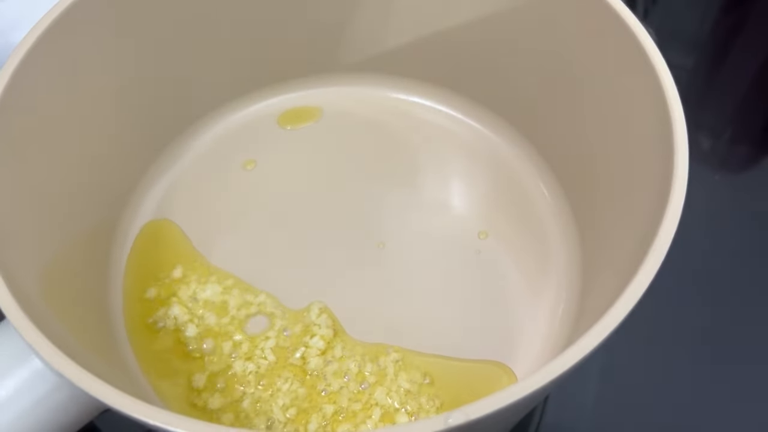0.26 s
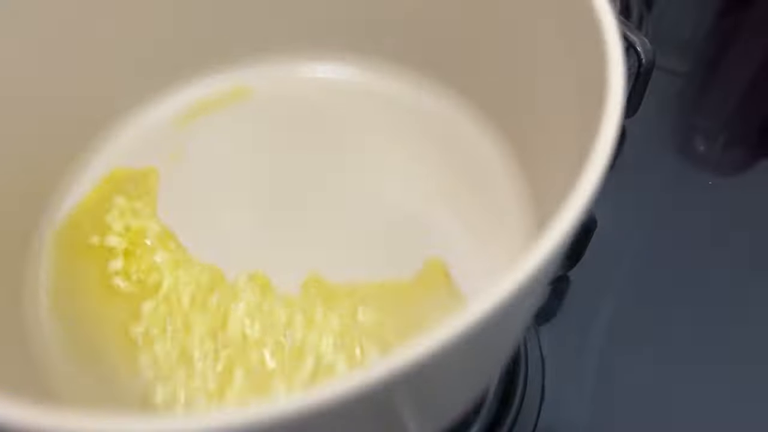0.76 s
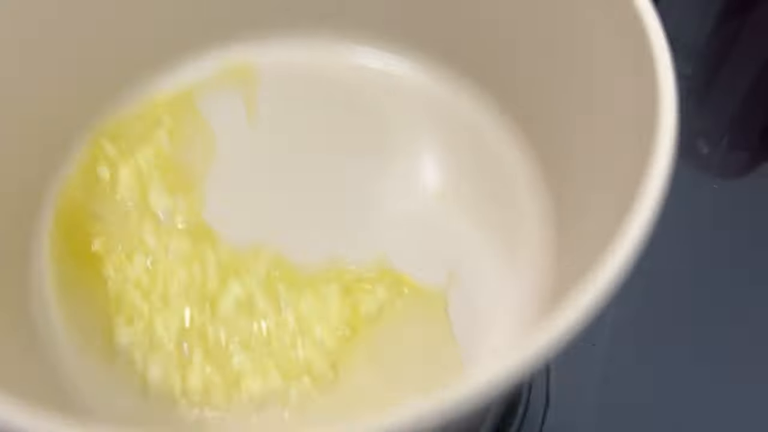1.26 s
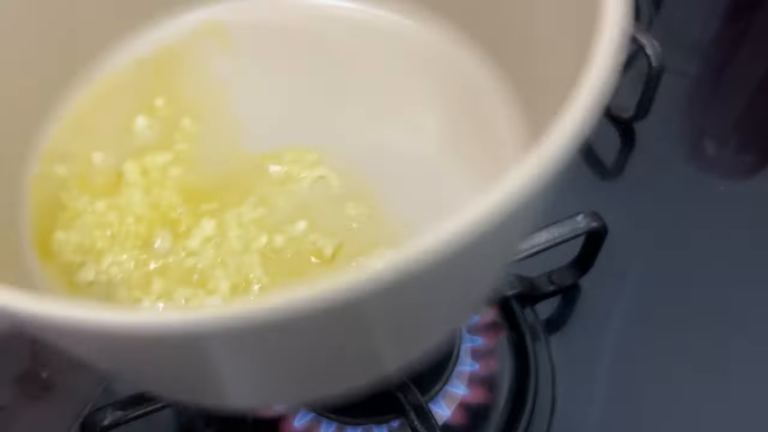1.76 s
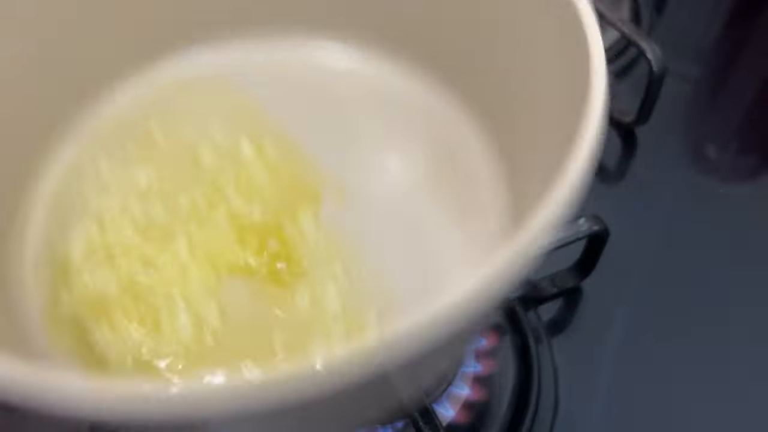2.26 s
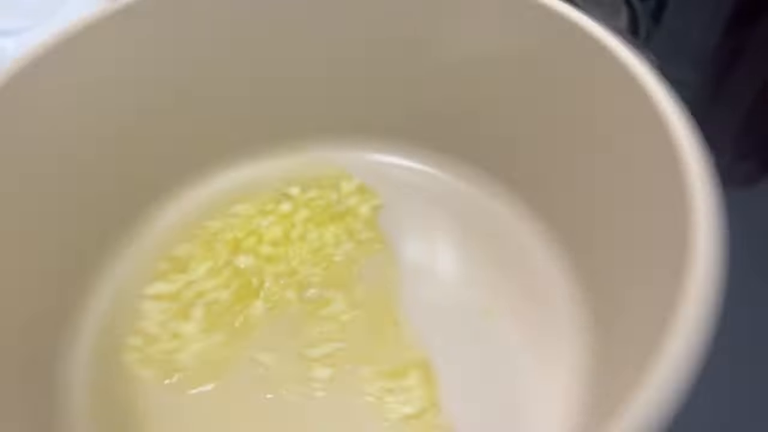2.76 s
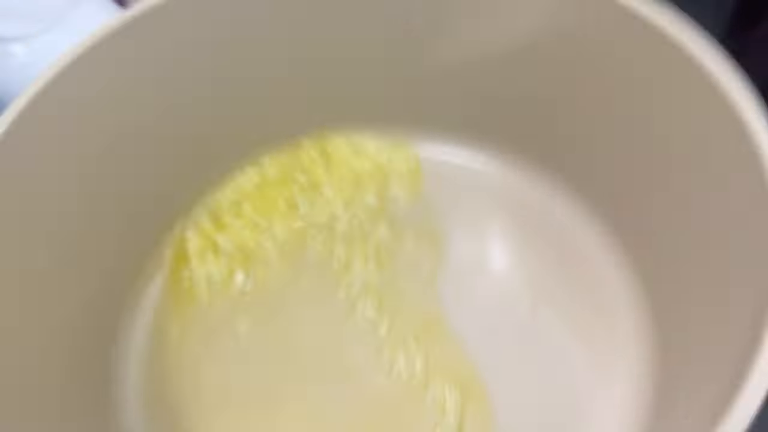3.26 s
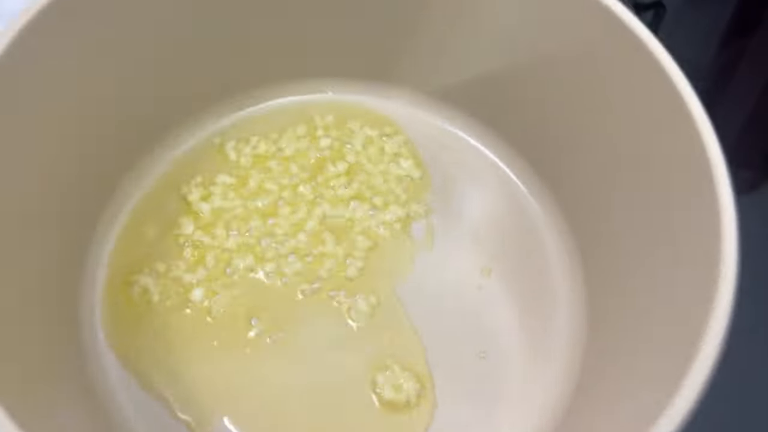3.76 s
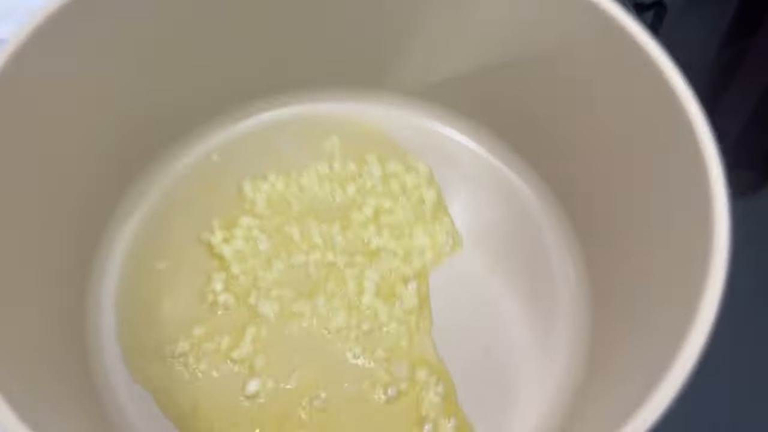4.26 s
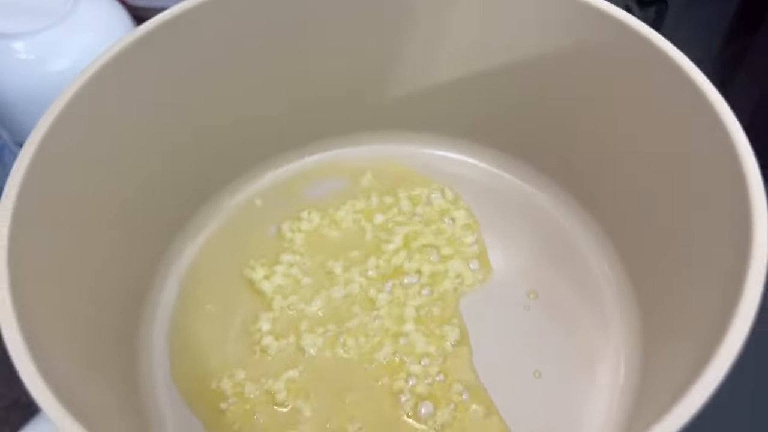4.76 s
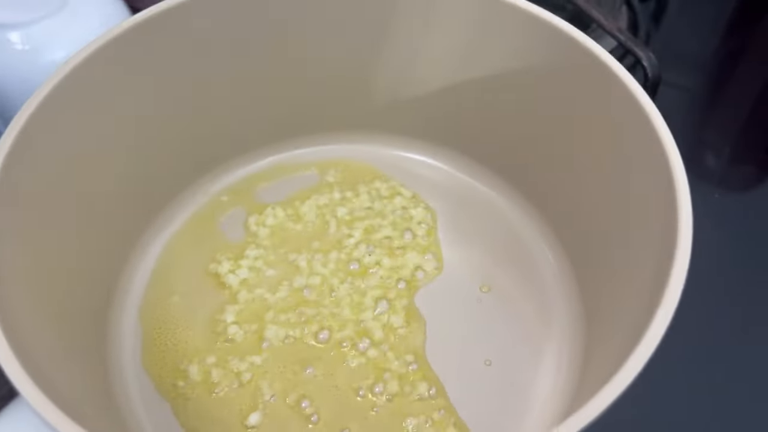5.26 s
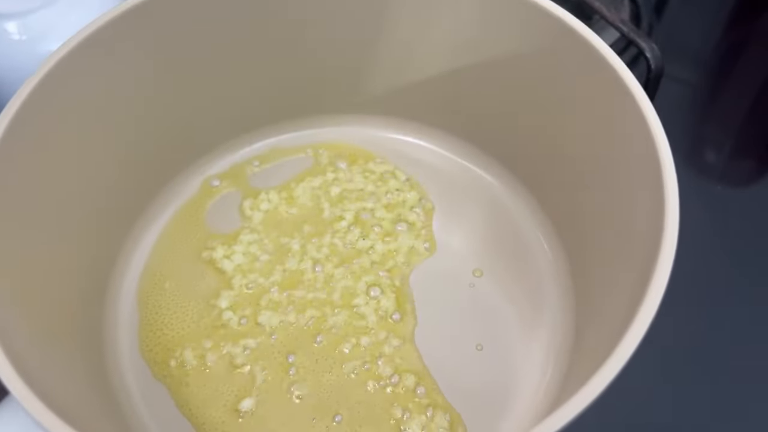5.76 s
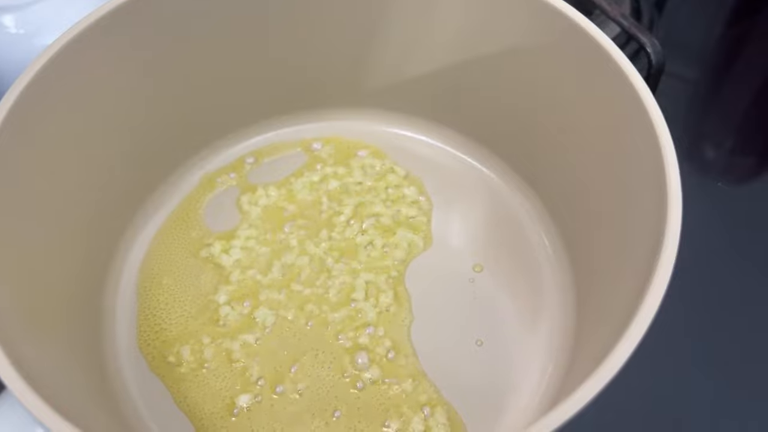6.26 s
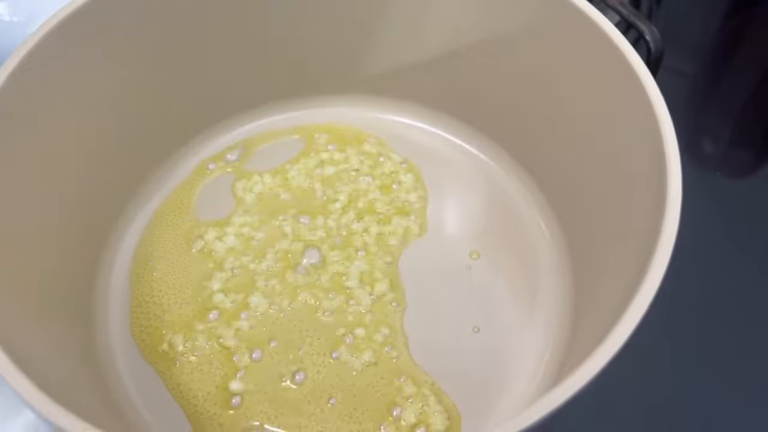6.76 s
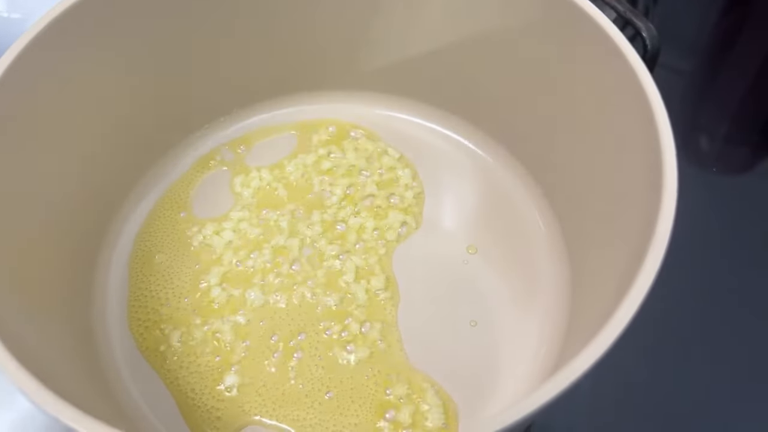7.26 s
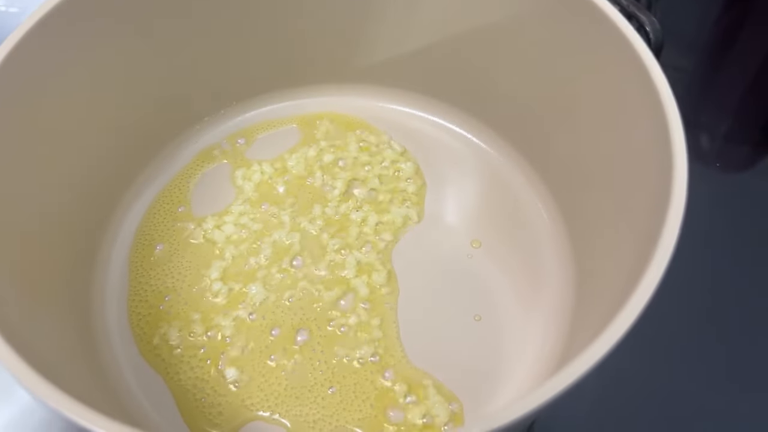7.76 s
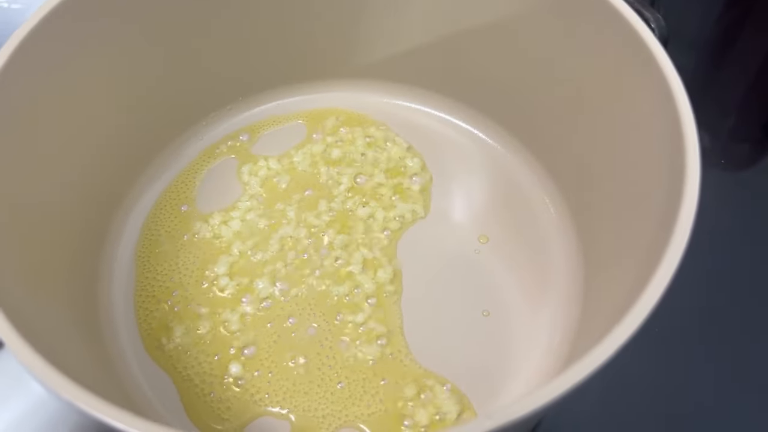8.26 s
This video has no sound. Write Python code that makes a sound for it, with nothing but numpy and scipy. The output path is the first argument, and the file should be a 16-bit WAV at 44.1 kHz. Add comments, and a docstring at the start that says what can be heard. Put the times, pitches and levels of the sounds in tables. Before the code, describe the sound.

A quiet sizzle in a pot, a tiny scrape near the start, then wave after wave of hissing as the garlic is swished over hot metal, growing to a dense, bright fizz with coarse bubbling and occasional spits. The pot is set down with a quick cluster of hollow knocks, and steady sizzling continues over soft low fan hum and flame rush. Close, dry, stereo, indoors.

```python
"""Minced garlic sizzles in oil, surging as the pot is swirled over a gas flame, then set down on the grate.
Steam bubbles are thousands of tiny rising bursts over a smooth hiss, coloured by the pot's resonances.
Large bubbles snap, blows ring the pot's modes over a low thump, and slips on the grate squeak.
Behind them a hood fan and the flame drone as shaped noise.
Two microphone ports hear it with a phase shift, through gain control."""
import sys
import numpy as np
from scipy import signal
from scipy.fft import rfft, irfft, next_fast_len
from scipy.io import wavfile
from scipy.ndimage import uniform_filter1d

SR = 44100
rng = np.random.default_rng(int(sys.argv[2]) if len(sys.argv) > 2 else 0)


def unload_wav(signal):
    """Save mono or channel-first audio to the path in sys.argv[1] as 16-bit WAV at rate SR, clipped to [-1, 1]."""
    wavfile.write(
        sys.argv[1],
        SR,
        np.round(np.clip(np.atleast_2d(signal).T, -1, 1) * 32767).astype(np.int16),
    )


N = 376163
HZ = np.fft.rfftfreq(1024, 1 / SR)  # pitches of the short-time spectra

# how hot and busy the oil is, before the surges: (t/s, fine fizz level/dB, coarse bubbling level/dB)
OIL_HEAT = [(0, -36, -42.5), (.5, -34, -41.5), (1.0, -30.5, -35), (1.5, -30, -37), (2.0, -24.5, -33.5),
            (2.33, -26, -34), (2.7, -21.5, -30.5), (3.2, -23.5, -30.5), (3.6, -20.5, -29.5),
            (4.1, -22, -34), (4.4, -19, -31.5), (4.72, -22, -36.5), (5.3, -21, -34.5), (5.7, -24, -37),
            (6.0, -21.5, -36), (6.4, -23, -36), (6.6, -21, -35.5), (8.53, -21.5, -36)]
# each swirl washes the garlic over hot metal and the sizzle surges:
# (middle t/s, length/s, fizz surge/dB, bubbling surge/dB)
SWIRLS = [(0.635, 0.16, 4.5, 2.5), (0.844, 0.28, 3.5, 3), (1.12, .2, 3.5, 3.5), (1.317, 0.35, 4.5, 5),
          (1.622, 0.3, 5.5, 5.5), (1.886, 0.33, 4.5, 5), (2.188, 0.34, 5.5, 7), (2.498, 0.48, 5.5, 5),
          (2.8, 0.17, 2, 3), (3.08, 0.18, 1, 3.5), (3.335, 0.4, 2.5, 3.5), (3.934, 0.28, 4.5, 3.5),
          (4.216, 0.12, 2, 4), (4.435, 0.15, 1, 1.5), (4.628, 0.18, 2, 4.5), (4.898, 0.22, 1.5, 0)]
# spectrum shape of the fine fizz: (f/Hz, relative level per Hz/dB)
FIZZ_COLOUR = [(2500, -42), (4500, -8.5), (6000, -7), (7500, -0.5), (9000, -1), (10500, -4), (12000, -12),
               (14000, -13.5), (15500, -13)]
# spectrum shape of the coarse bubbling: (f/Hz, relative level per Hz/dB)
BUBBLING_COLOUR = [(300, -35.5), (700, -5), (1300, -14), (2000, -12.5), (2900, -2.5), (4200, -5),
                   (6000, -1), (9000, -15)]


def sizzle():
    """Steam bubble bursts over a smooth hiss, coloured by the pot and surging with each swirl."""
    pops, colour = bubbles(per_s=5000, cycles=4.53)
    t, pops = spectra(pops)
    hiss = spectra(rng.standard_normal((2, N)))[1]
    white_pops = pops / np.maximum(colour, 0.1)[:, None]
    pop_share = 0.45  # of the power
    grain = np.sqrt(pop_share) * white_pops + np.sqrt(1 - pop_share) * hiss

    s, fizz_db, bubbling_db = np.transpose(OIL_HEAT)
    surges_db = sum(np.outer(db, swell(t, middle, length)) for middle, length, *db in SWIRLS)
    fizz_db = surges_db[0] + np.interp(t, s, fizz_db)
    bubbling_db = surges_db[1] + np.interp(t, s, bubbling_db)

    # lasting heat brightens the treble above 9 kHz; quick surges pull it back
    heat_db = uniform_filter1d(fizz_db, 200)
    octaves_up = np.clip(np.log2(HZ / 9000 + 1e-9), 0, 1)
    bright_db = np.outer(octaves_up, 0.27 * (heat_db + 22) - 0.18 * (fizz_db - heat_db))

    pot_db = pot_lift_db()
    fizz_shape = unit_band(read(FIZZ_COLOUR, HZ) + pot_db, 6800, 9400)
    bubbling_shape = unit_band(read(BUBBLING_COLOUR, HZ) + pot_db, 2900, 4000)
    fizz = fizz_shape[:, None] * gain_of(fizz_db) * gain_of(bright_db)
    bubbling = bubbling_shape[:, None] * gain_of(bubbling_db)

    # small patches of time and pitch stand out at random
    patches = rng.standard_normal(grain.shape[1:])
    patches = evened(uniform_filter1d(uniform_filter1d(patches, 8, 0), 8, 1))
    coloured = grain * np.hypot(fizz, bubbling) * gain_of(1.47 * patches)
    return clumped(coloured, shared_db=0.54, own_db=0.49)


def bubbles(per_s, cycles):
    """Two unrelated streams of tiny bursts, each a few rising cycles, with their average spectrum."""
    out, power = np.zeros((2, N)), 0
    starts = rng.random((2, N)) < per_s / SR
    kind = rng.integers(0, 12, (2, N))
    for k, hz in enumerate(np.geomspace(1200, 16000, 12)):
        u = np.arange(96) * hz / SR / cycles
        burst = evened(u * np.exp(-3 * u) * np.sin(2 * np.pi * cycles * u * (1 + 0.071 * u)))
        out += signal.oaconvolve(1.0 * (starts & (kind == k)), burst[None], axes=1)[:, :N]
        power = power + abs(rfft(burst, 1024)) ** 2
    return evened(out), evened(np.sqrt(power))


def clumped(z, shared_db, own_db):
    """Bursts come in clumps: a flicker common to all pitches plus one for each pitch band."""
    centres = np.geomspace(1500, 14000, 4)
    shared, out = wander(41), 0
    for k in range(len(centres)):
        band = np.interp(np.log(HZ + 1), np.log(centres), np.arange(len(centres)) == k)
        flicker_db = shared_db * shared + own_db * wander(70)
        out = out + waves(z * band[:, None]) * gain_of(flicker_db)
    return out


def swell(t, middle, length):
    """One smooth hump of height 1."""
    return np.cos(np.pi * np.clip((t - middle) / length, -0.5, 0.5)) ** 2


# single large bubbles: (t/s, level/dB, f/Hz)
SPITS = [(2.144, 3, 9800), (2.7041, 2, 7900), (3.0898, -2, 8400), (3.6364, -4, 9600), (3.7822, -8, 7400),
         (3.8238, -3, 10200), (3.9867, 0, 8200), (4.237, -2, 10100), (4.9123, -5, 7700), (5.118, -6, 9500),
         (6.0815, -6, 7940)]


def spits():
    """A large bubble bursts: a snap of a few cycles, then a faint puff of spray."""
    out, t = np.zeros(N), np.arange(SR // 40) / SR
    for s, db, hz in SPITS:
        u = t / 0.00026  # the snap peaks after 0.26 ms
        snap = u * np.exp(1 - u) * np.sin(2 * np.pi * hz * t)
        puff = gain_of(-17 - 60 * t / 0.028) * band_noise(len(t), hz, 0.17)
        add(out, s, gain_of(db) * (snap + puff))
    return out


# pot wall modes: (f/Hz, t60/s, level under a blow/dB, lift in the steady sounds/dB, width of that lift/Hz)
POT_MODES = [(445, 0.02, 3, 2, 60), (625, 0.055, -3.5, -7, 180), (719, 0.067, 1, 5, 27),
             (1090, 0.018, -1.5, 1, 74), (1253, 0.11, -10.5, 7.5, 16), (1536, 0.027, -14, 8.5, 155),
             (1646, 0.17, -18.5, 0, 46), (1990, 0.029, -7, 0, 60), (2316, .025, -12, 7.5, 105),
             (2395, 0.031, 5.5, 3.5, 76), (2730, 0.054, -15, -4, 77), (3840, 0.022, -24, 5.5, 225),
             (4280, 0.028, -8, -8, 91), (6010, 0.033, 7, 3.5, 40)]
# pot against grate: (t/s, level/dB, best-driven f/Hz, reach/octaves, pitch factor, ring length factor,
# thump level against the blow/dB)
KNOCKS = [(.375, -18.5, 1310, .2, 1.01, 2.5, -30), (5.208, -3.5, 805, 0.85, 0.94, 0.64, -7),
          (5.265, -7, 855, 0.87, 0.98, 0.94, -14), (5.297, -10, 800, 0.98, 1, 1.2, -13),
          (5.315, -13.5, 1200, 0.59, .95, 1.2, -20), (5.593, -2.5, 3530, 2.3, 1.002, 1.23, -25),
          (5.638, -18.5, 900, .9, 1.07, 1.4, -8), (5.793, -8.5, 810, 0.72, 1, 0.89, -17)]


def knocks():
    """Each blow rings the pot modes near the pitch it drives best; the grate thumps a moment later."""
    contact_s, thump_delay_s, thump_hz, thump_t60_s = 0.0035, 0.0182, 62, 0.08
    grit_db, grit_t60_s = -5, 0.04
    out, t = np.zeros(N), np.arange(SR // 5) / SR
    phases = rng.random((len(KNOCKS), len(POT_MODES)))
    for (s, db, best_hz, reach, pitch, length, thump_db), turns in zip(KNOCKS, phases):
        ring = np.zeros(len(t))
        for (hz, t60, mode_db, _, _), turn in zip(POT_MODES, turns):
            missed_db = 5.7 * (np.log2(hz / best_hz) / reach) ** 2
            fade = gain_of(mode_db - missed_db - 60 * t / (t60 * length))
            ring += fade * np.sin(2 * np.pi * (hz * pitch * t + turn))
        # grit in the contact
        ring += gain_of(grit_db - 60 * t / grit_t60_s) * band_noise(len(t), best_hz, reach)
        # the contact builds up over a few milliseconds
        add(out, s, gain_of(db) * ring * (1 - np.exp(-(t / contact_s) ** 2)))
        thump = gain_of(db + thump_db - 60 * t / thump_t60_s) * np.sin(2 * np.pi * thump_hz * t)
        add(out, s + thump_delay_s, thump)
    return out


def pot_lift_db():
    """The pot's resonances lift the steady sounds near its modes."""
    return lifts(HZ, [(f, w, max(db, 0)) for f, _, _, db, w in POT_MODES])


# pot slipping on the grate: (start t/s, length/s, level/dB, squeak from f/Hz, to f/Hz)
SLIDES = [(0.299, 0.031, -24, 675, 670), (.327, .02, -28, 685, 680), (.352, 0.017, -26.5, 590, 610),
          (0.361, .028, -29.5, 700, 700), (5.322, 0.026, -25, 616, 620), (5.344, 0.057, -20, 707, 735),
          (5.38, 0.059, -26.5, 736, 733)]


def slides():
    """Each slip makes one low pot mode sing, swelling and dying unevenly."""
    out = np.zeros(N)
    for s, length, db, from_hz, to_hz in SLIDES:
        u = np.linspace(0, 1, round(length * SR))
        turns = np.cumsum(from_hz + (to_hz - from_hz) * u) / SR
        grip = 1 + 0.25 * evened(uniform_filter1d(rng.standard_normal(4000), 250))[:len(u)]
        squeak = np.sqrt(2) * np.sin(2 * np.pi * turns)
        add(out, s, gain_of(db) * squeak * grip * np.sin(np.pi * u ** 1.06))
    return out


# spectrum shape of fan and flame: (f/Hz, relative level per Hz/dB)
AIR_COLOUR = [(15, -50), (32, -23), (45, -10.5), (100, -3), (145, -3), (190, -10.5), (340, -11.5),
              (420, -18), (900, -18.5), (1250, -29.5), (2000, -24), (4000, -32.5), (10500, -29),
              (11800, -56), (16000, -43)]
# drone bands: (f/Hz, width/Hz, lift/dB)
DRONE_BANDS = [(55, 19.6, 8.3), (114.9, 20.6, 5.8), (260, 24.5, 6.6), (337, 17, 4.8)]
# fan and flame over time: (t/s, level/dB)
AIR_LEVEL = [(0, -30), (.6, -28.5), (1.6, -27.5), (2.9, -29), (3.7, -28), (5.4, -28.5), (6, -30),
             (8.53, -30)]


def air():
    """Fan rumble with fuzzy drone bands and the flame's hiss under the pot, as shaped noise."""
    size = next_fast_len(N)
    hz = np.fft.rfftfreq(size, 1 / SR)
    pot_db = 1.68 * np.interp(hz, HZ, pot_lift_db())
    db = read(AIR_COLOUR, hz) + lifts(hz, DRONE_BANDS) + pot_db
    noise = irfft(rfft(rng.standard_normal((2, size))) * gain_of(db), size)[:, :N]
    level_db = np.interp(np.arange(N) / SR, *np.transpose(AIR_LEVEL)) + 1.1 * wander(11)
    return gain_of(level_db) * evened(noise)


def gain_of(db):
    """Decibels to gain."""
    return 10 ** (np.asarray(db) / 20)


def evened(x):
    """Scales to rms 1."""
    return x / np.sqrt(np.mean(abs(x) ** 2) + 1e-20)


def read(points, hz, axis=1):
    """Reads one column of a spectrum table on a log-frequency axis."""
    points = np.array(points)
    return np.interp(np.log(hz + 1), np.log(points[:, 0] + 1), points[:, axis])


def add(mix, s, sound):
    """Mixes a sound in at time s."""
    part = mix[round(s * SR):][:len(sound)]
    part += sound[:len(part)]


def lifts(hz, bands):
    """Summed dB bumps of (f/Hz, width/Hz, lift/dB) resonances."""
    return sum(db / (1 + (2 * (hz - f) / w) ** 2) for f, w, db in bands)


def spectra(x):
    """Frame times and short-time spectra."""
    return signal.stft(x, SR, nperseg=1024, noverlap=768)[1:]


def waves(z):
    """Back from short-time spectra."""
    return signal.istft(z, SR, nperseg=1024, noverlap=768)[1][..., :N]


def unit_band(db, lo_hz, hi_hz):
    """Spectrum gain that gives white noise rms 1 inside the band."""
    g = gain_of(db)
    return g / np.sqrt(np.sum(g[(HZ > lo_hz) & (HZ < hi_hz)] ** 2) / len(HZ))


def wander(rate):
    """Slow random drift, rms 1; a higher rate drifts faster."""
    size = int(SR / rate)
    return evened(uniform_filter1d(uniform_filter1d(rng.standard_normal(N), size), size))


def band_noise(size, hz, octaves):
    """Noise of rms 1 in a band reaching some octaves either side of hz."""
    edges = np.clip([hz * 2 ** -octaves, hz * 2 ** octaves], 100, SR / 2 - 1000)
    sos = signal.butter(2, edges, "band", fs=SR, output="sos")
    return evened(signal.sosfilt(sos, rng.standard_normal(size)))


def ducked(x, size, knee_db, depth, recovery_db_s):
    """Turns the level down just after the power passes the knee, then lets it recover."""
    power_db = 10 * np.log10(abs(uniform_filter1d((x ** 2).mean(0), size)) + 1e-12)
    fall = np.arange(N) * recovery_db_s / SR
    held_db = np.maximum.accumulate(power_db + fall) - fall
    over_db = np.maximum(held_db - knee_db, 0)
    # the shifted window looks back in time
    return x / gain_of(depth * uniform_filter1d(over_db, size, origin=size // 2 - 1))


def scene():
    """Channel 0 reaches both ports; channel 1 goes only to the right port:
    unrelated sizzle and air, plus the same contacts and spits 7 dB quieter."""
    knocks_slides_spits = knocks() + slides() + spits()
    return sizzle() + air() + knocks_slides_spits * gain_of([[0], [-7]])


# right port against left: (f/Hz, likeness 0-1, lag/turns, level drop/dB)
PORTS = [(60, .995, .01, .2), (150, .975, .02, .8), (400, .86, .06, 1.8), (700, .72, .11, 6.5),
         (1100, .68, .05, 4), (1700, .35, -.05, 4.5), (2700, .1, .2, 3.5), (3200, .68, .05, .5),
         (4300, .81, .02, 1.3), (5500, .65, .11, 3.5), (6300, .73, .01, 4.2), (7500, .87, .12, 2.9),
         (8500, .97, 0, .4), (10200, .94, 0, 0), (15000, .85, 0, 0)]


def record(dry):
    """Port pair, bass roll-off, slow gain control, fast peak control, clipping, band limit."""
    lead_from_hz, lead_s = 8380, 0.000281  # above this pitch the right port leads by a steady time
    common, other = spectra(dry)[1]
    same, lag, drop_db = (read(PORTS, HZ, axis=k)[:, None] for k in (1, 2, 3))
    lag = lag - lead_s * np.maximum(HZ - lead_from_hz, 0)[:, None]
    right = same * common + np.sqrt(1 - same ** 2) * other
    right = right * np.exp(-2j * np.pi * lag) * gain_of(-drop_db)
    rolloff = signal.butter(3, 36, "high", fs=SR, output="sos")
    pair = signal.sosfilt(rolloff, [dry[0], waves(right)])
    pair = ducked(pair, size=600, knee_db=-18.5, depth=0.15, recovery_db_s=10.0)
    pair = ducked(pair, size=40, knee_db=-9.5, depth=0.49, recovery_db_s=250.0)
    band_limit = signal.firwin(1023, 15740, window=("kaiser", 9), fs=SR)
    return signal.oaconvolve(np.clip(pair, -1, 1), band_limit[None], "same")


dry = scene()
out = record(dry)
unload_wav(out)
```